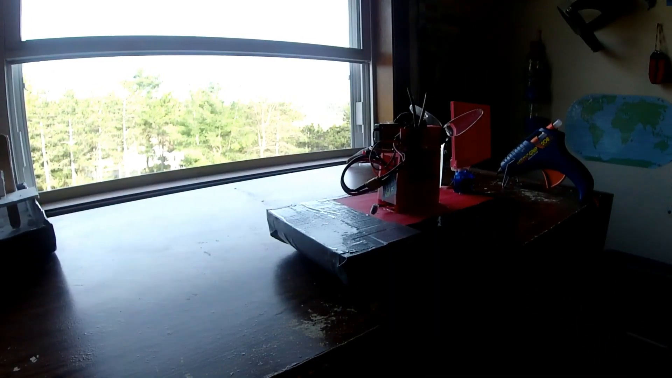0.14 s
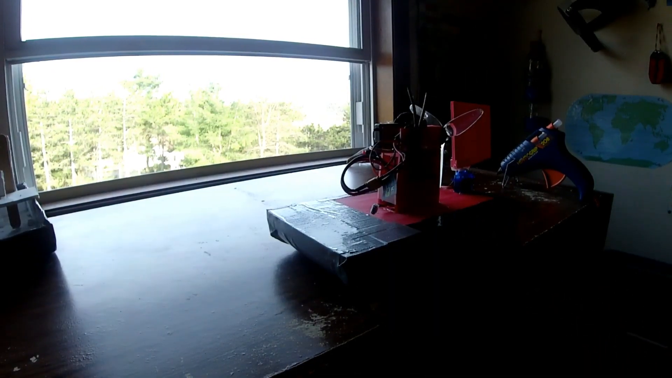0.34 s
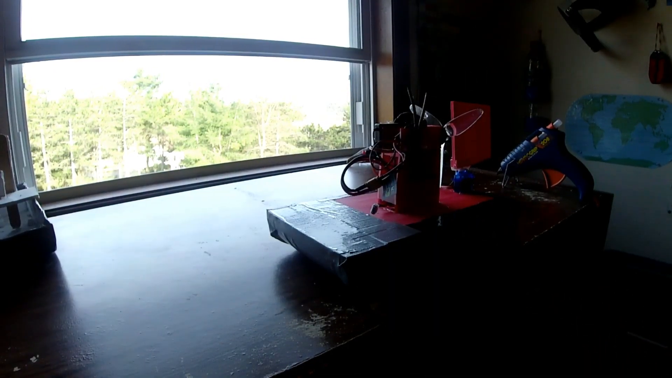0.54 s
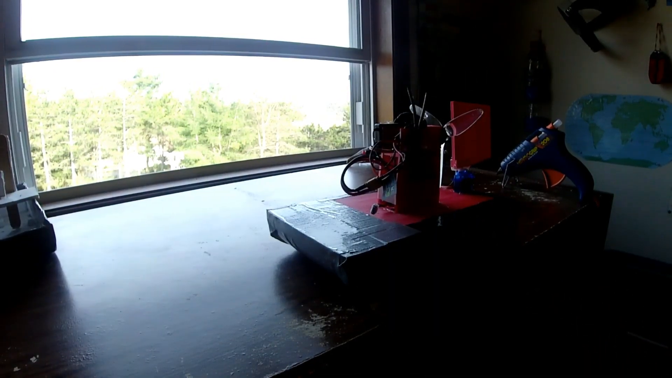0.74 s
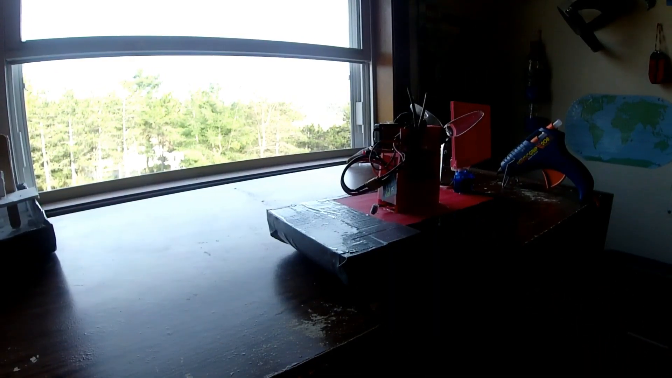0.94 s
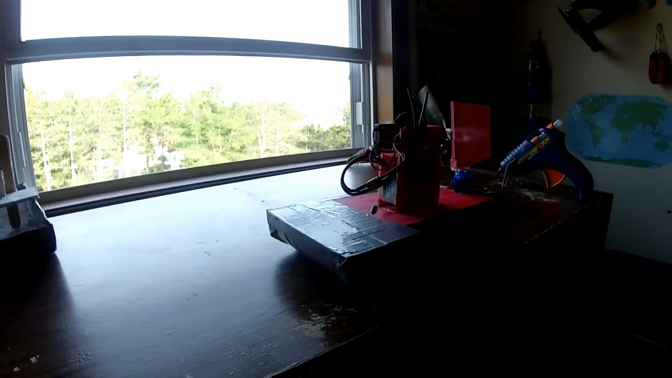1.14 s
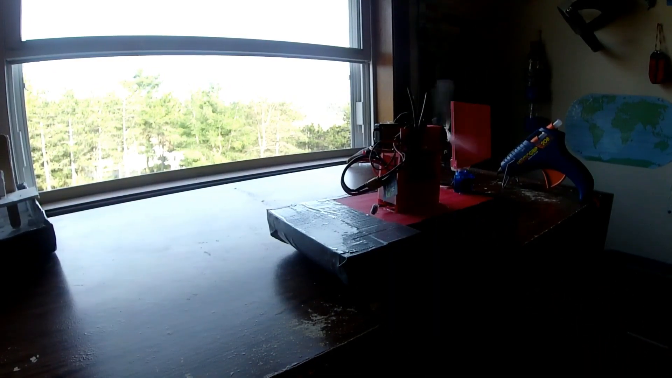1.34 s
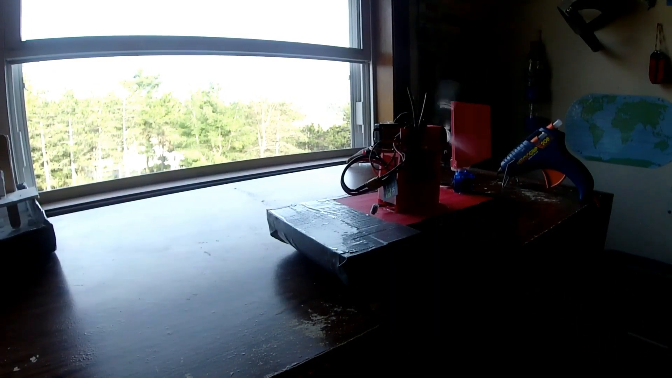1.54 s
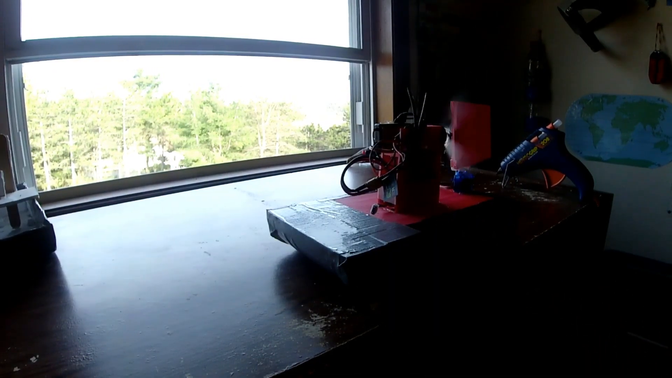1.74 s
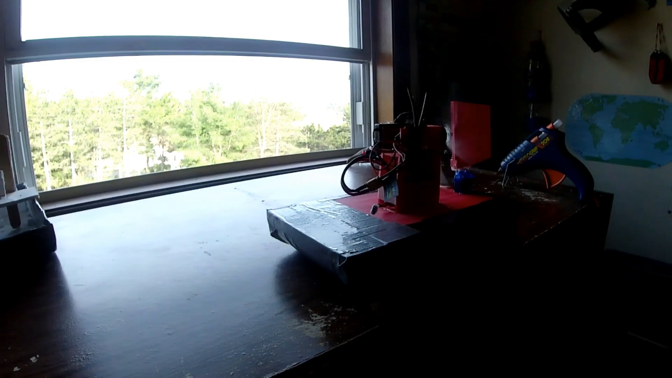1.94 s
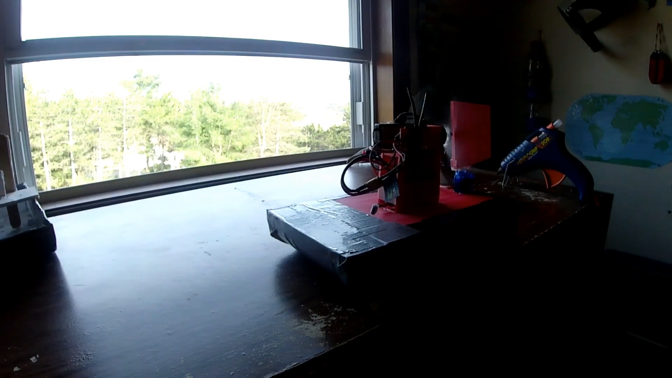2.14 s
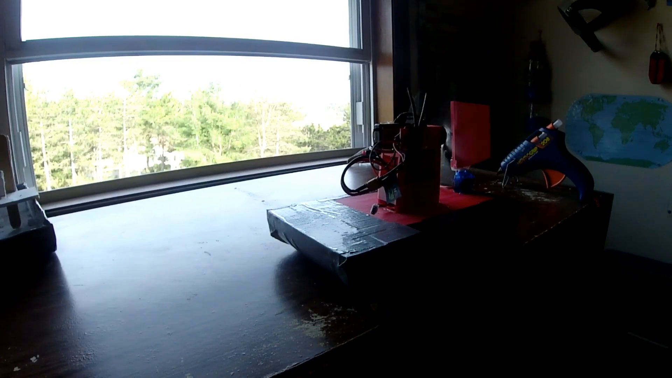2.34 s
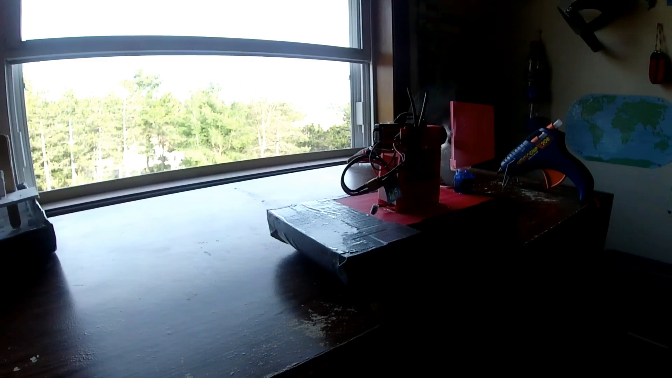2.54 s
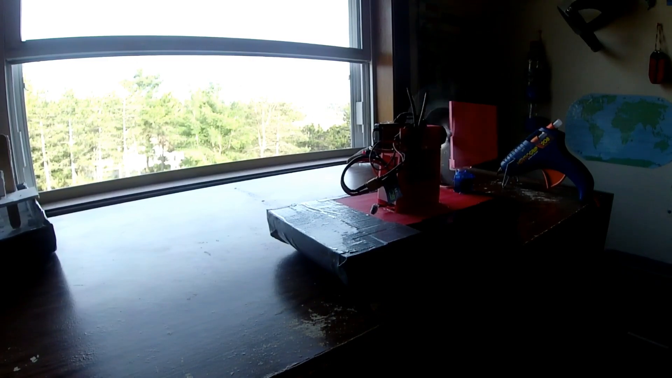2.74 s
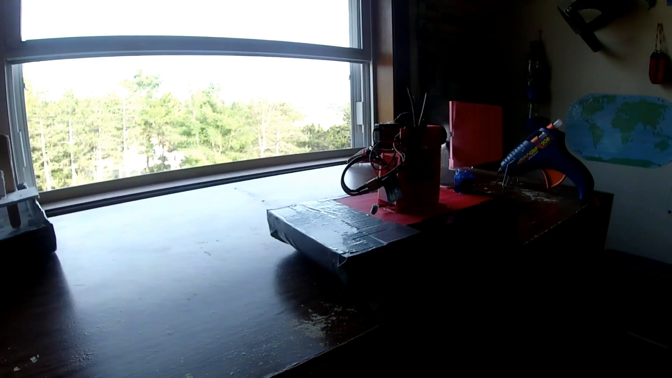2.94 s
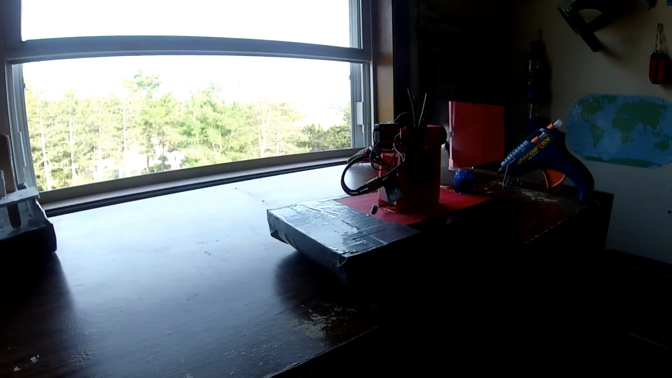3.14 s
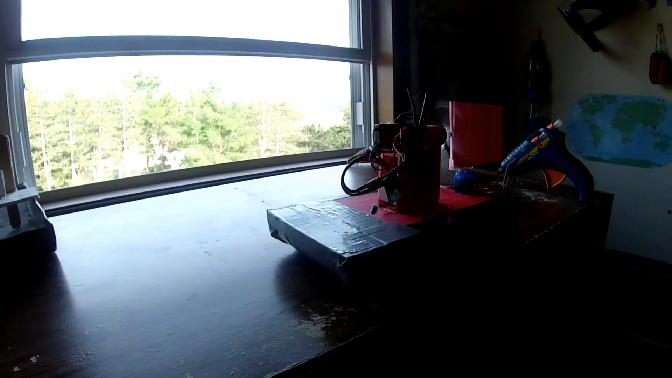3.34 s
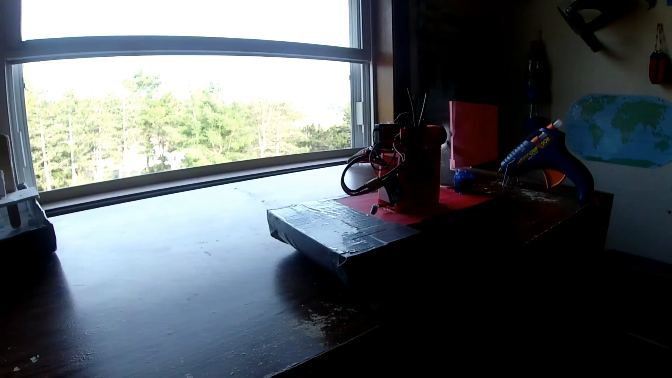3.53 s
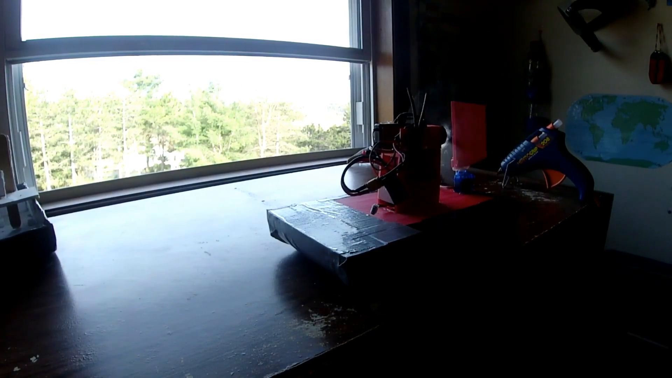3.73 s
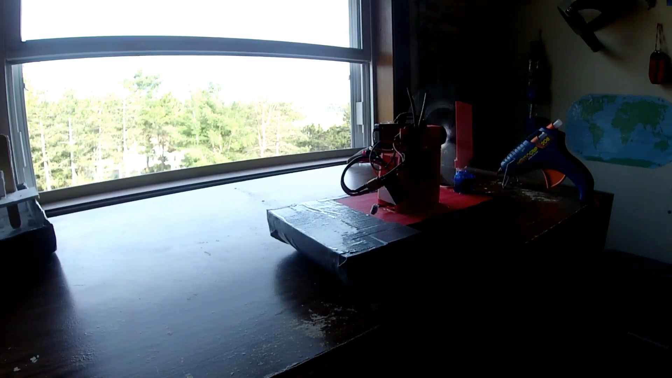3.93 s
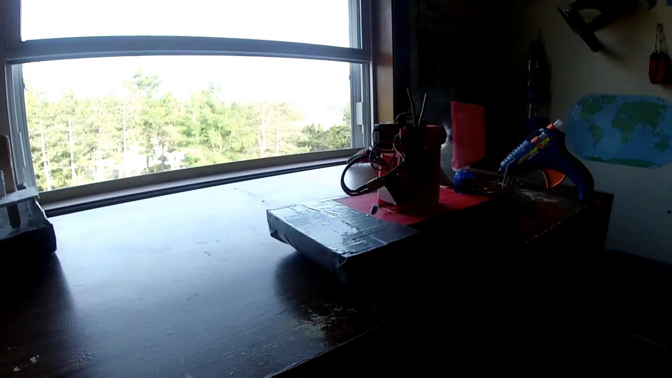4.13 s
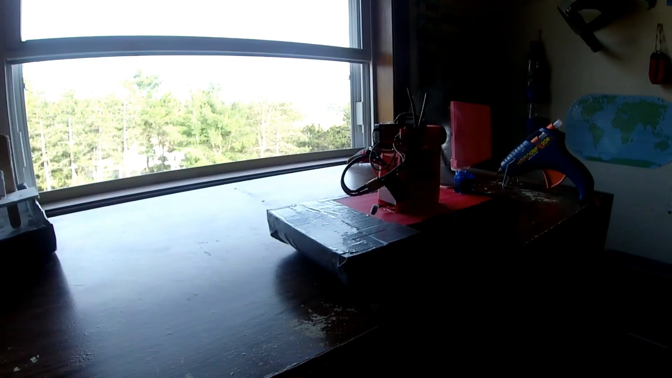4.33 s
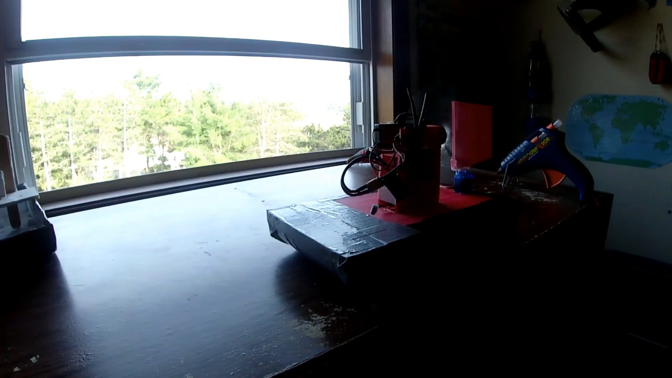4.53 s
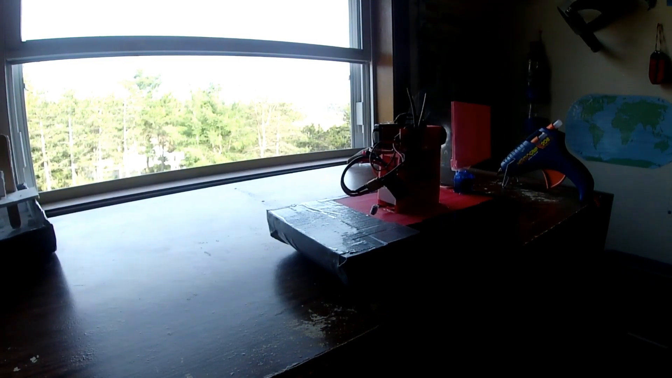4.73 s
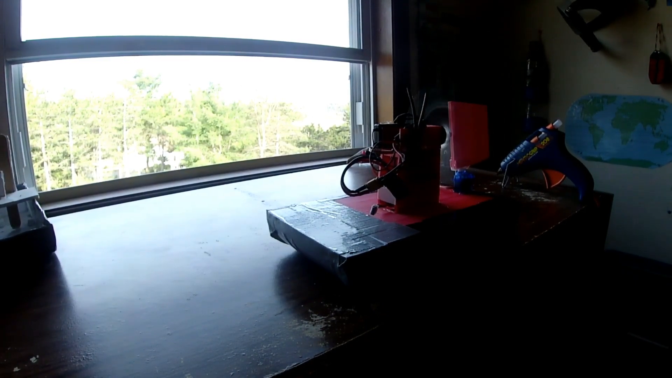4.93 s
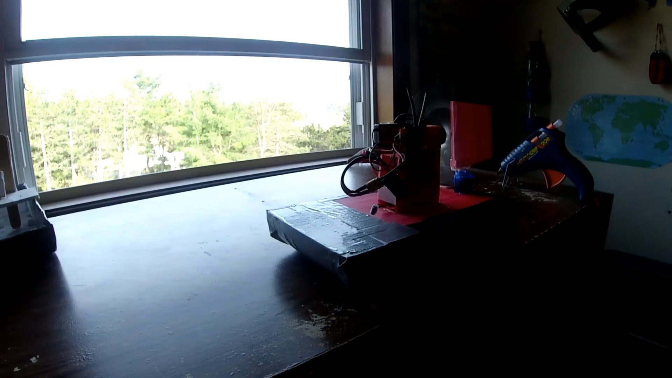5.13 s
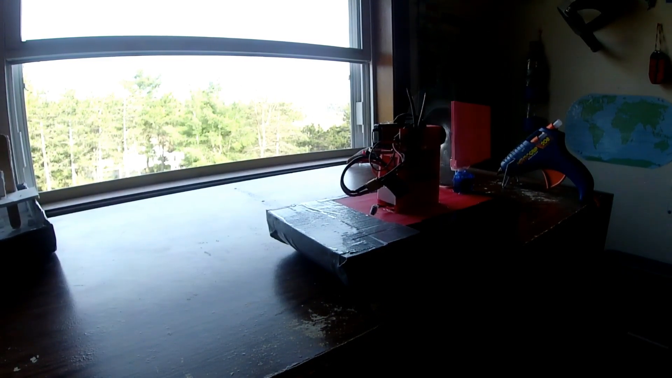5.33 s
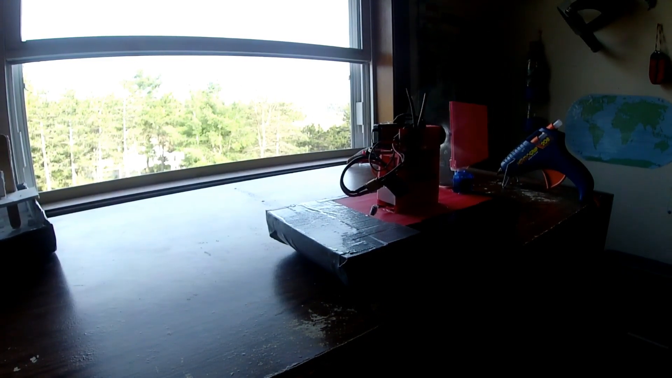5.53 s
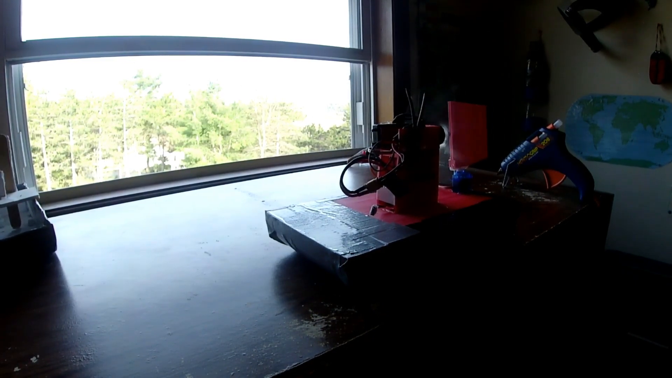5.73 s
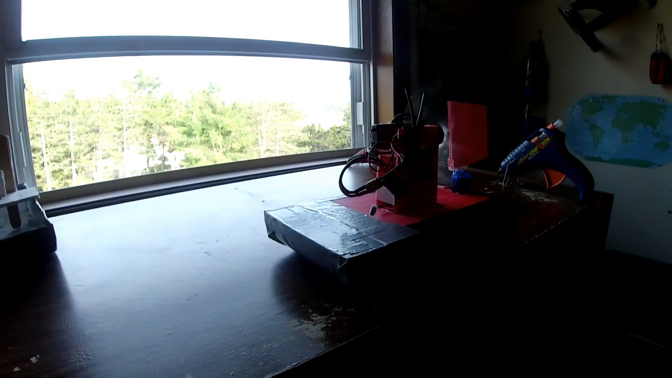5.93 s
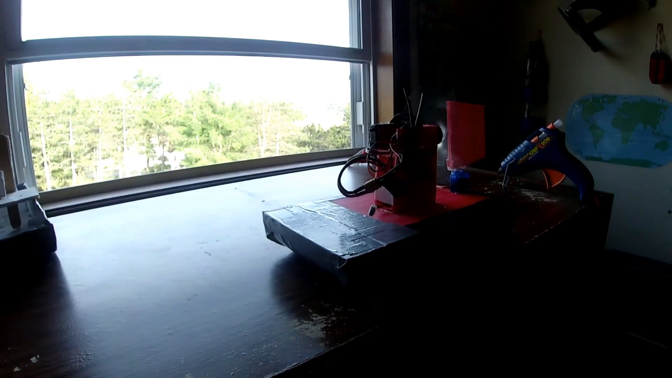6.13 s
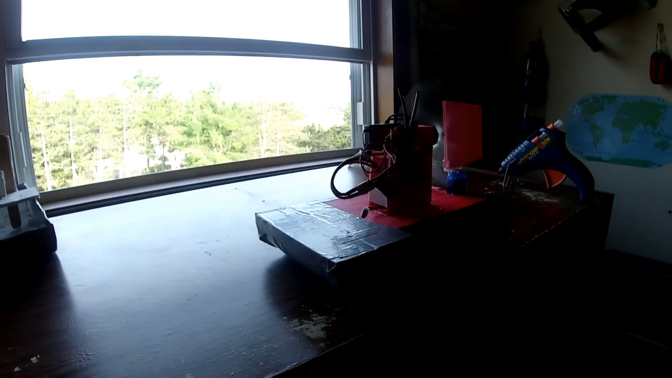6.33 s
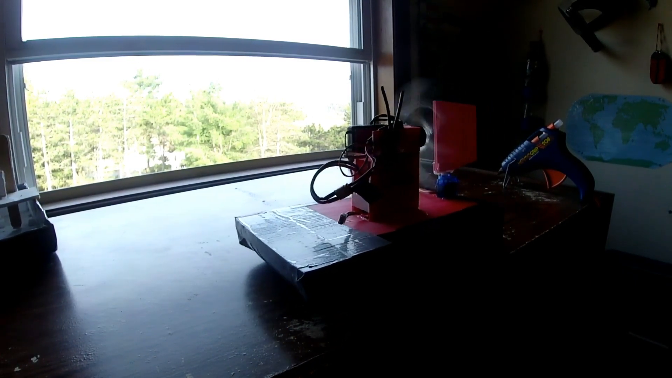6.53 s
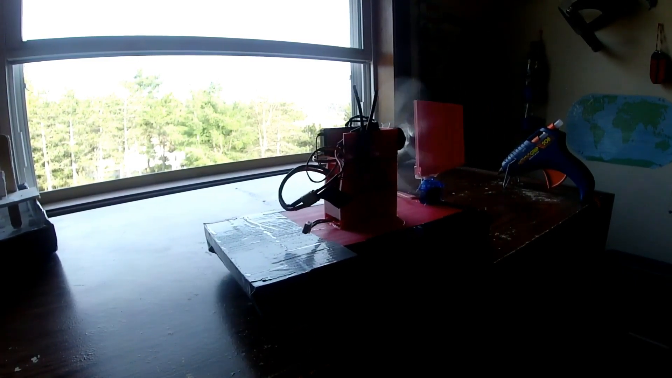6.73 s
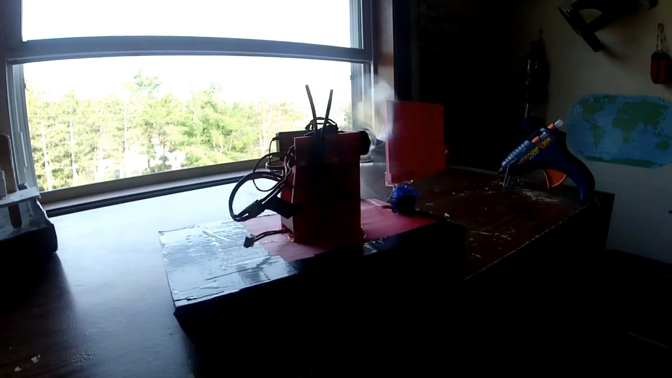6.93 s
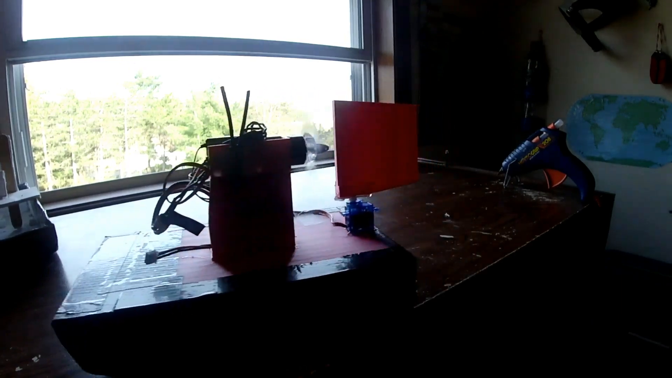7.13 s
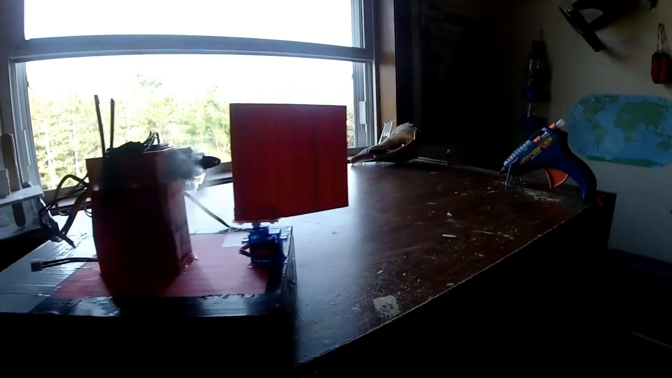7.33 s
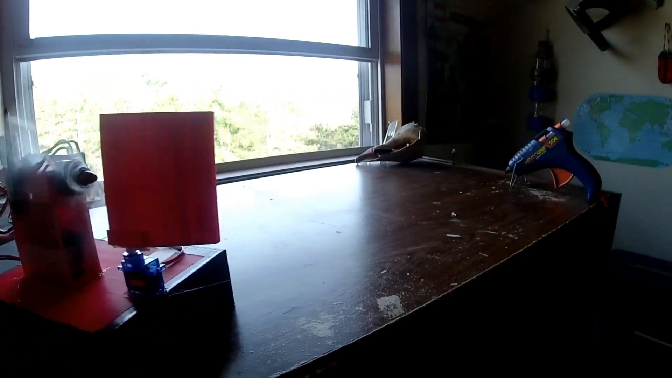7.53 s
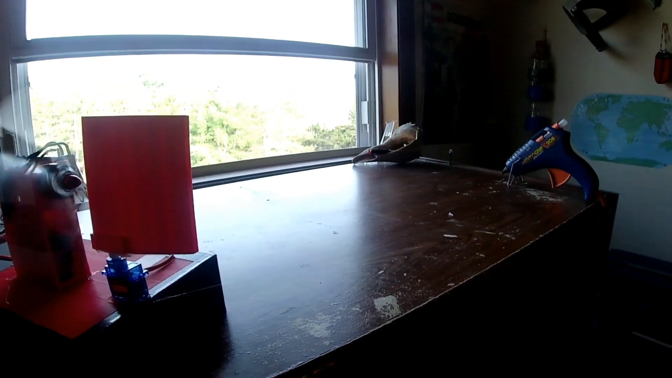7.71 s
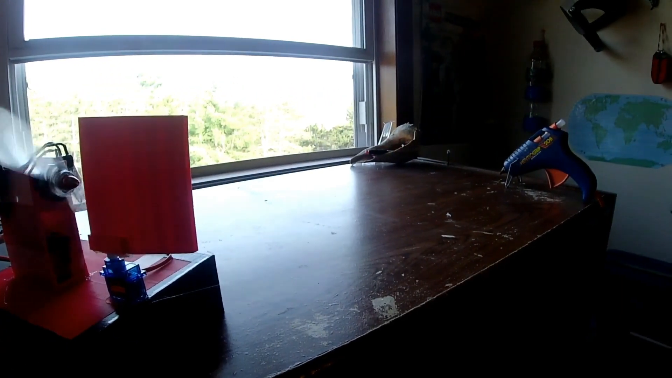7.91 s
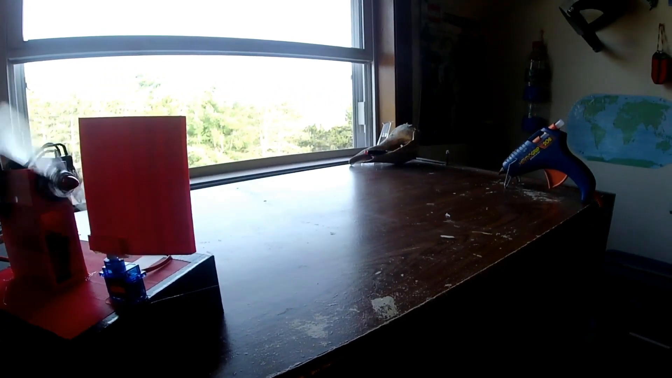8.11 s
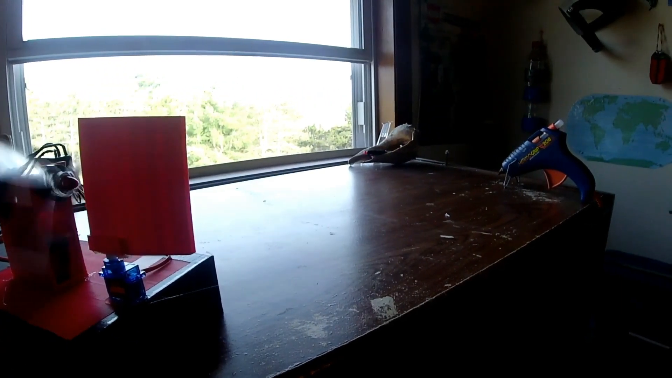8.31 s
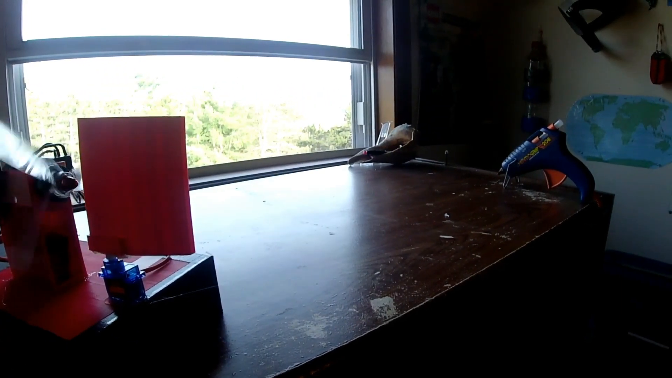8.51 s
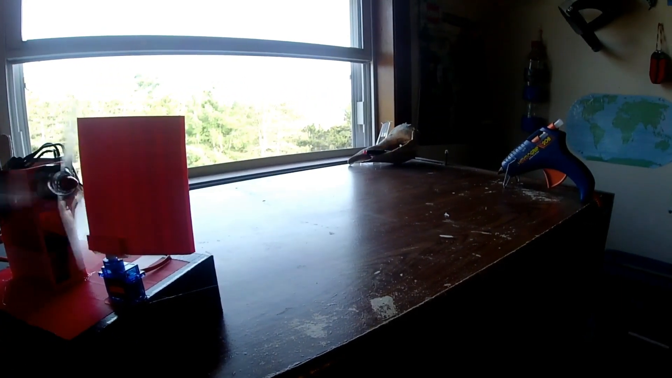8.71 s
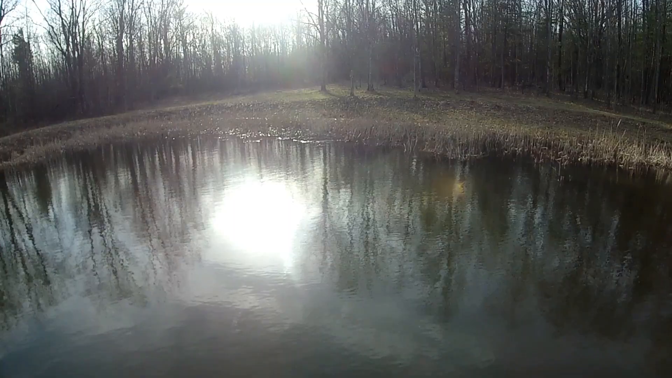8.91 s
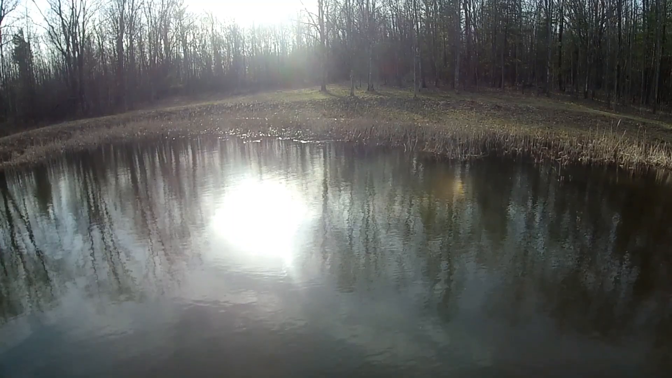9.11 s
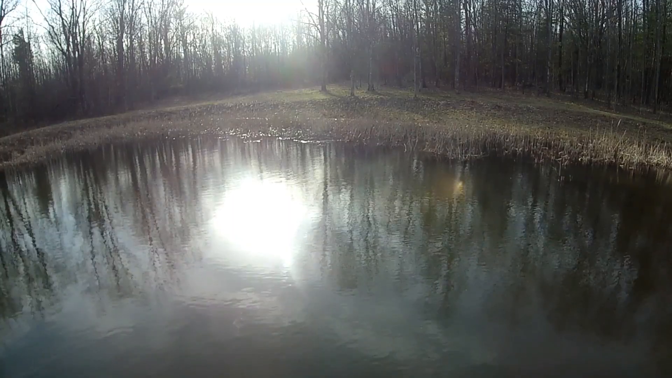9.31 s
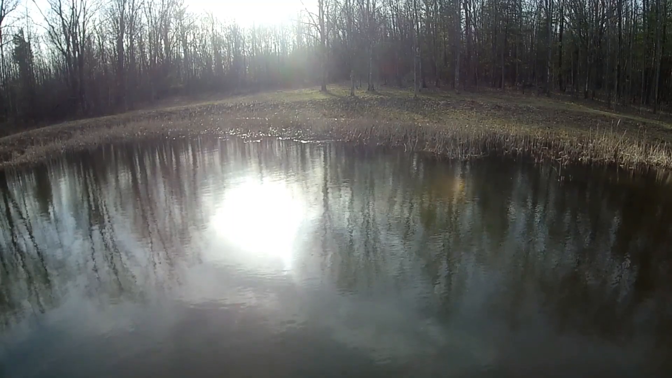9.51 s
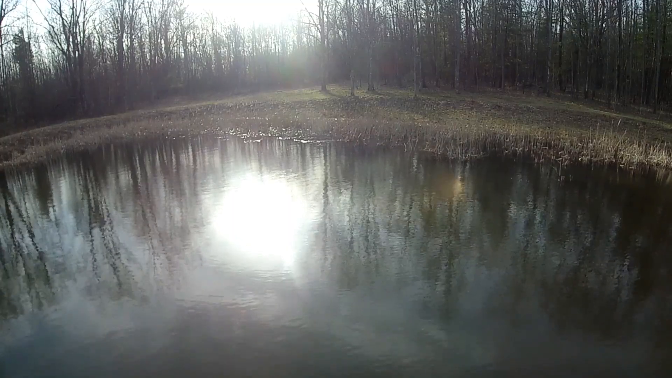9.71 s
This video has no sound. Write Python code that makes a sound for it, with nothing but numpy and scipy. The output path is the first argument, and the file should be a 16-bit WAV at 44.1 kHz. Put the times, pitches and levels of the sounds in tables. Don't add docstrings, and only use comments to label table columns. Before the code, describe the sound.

Quiet small-room tone with a tiny tap at the start. At about 1 second a small electric motor switches on with a thin, very high, nearly steady electronic whine and a gritty buzz; the rotor lurches and falters until about 1.5 seconds, then catches. From 2 seconds the three-blade propeller hums higher in uneven steps, dipping slightly near 3.3 and 4.3, with a soft desk bump around 3.8. Air hiss thickens, gusts roughen the blade buzz around 5 to 6, and brief metallic chirps pass. From 6.3 to 7.4 it holds full speed, a loud, rough, windy drone, creeping closer. Near 7.5 power cuts: the whine stops and the drone slides quickly downward, fading into faint cogging and air by 8.6. Close finger taps and rubs begin around 8.1, cluster at 8.7 with a sharp button click, then everything cuts to silence at 8.93.

```python
import sys
import numpy as np
from scipy import signal
from scipy.fft import rfft, irfft, next_fast_len
from scipy.io import wavfile
from scipy.ndimage import uniform_filter1d

SR = 44100
rng = np.random.default_rng(int(sys.argv[2]) if len(sys.argv) > 2 else 0)


def to_linear_factor(level_db):
    exponent = np.asarray(level_db, float) / 20
    return 10 ** exponent


def master(y):
    cut = np.clip(np.atleast_2d(y).T, -1, 1)
    pcm = np.round(cut * 32767)
    wavfile.write(sys.argv[1], SR, pcm.astype(np.int16))


N = 434826
T = np.arange(N) / SR
SLOW = T[::128]
FULL_HZ = 163
POWER_ON_S, POWER_OFF_S = .971, 7.52


def full(control):
    return np.interp(T, SLOW, control)


def rises(clock, start_s, length_s):
    return np.clip((clock - start_s) / length_s, 0, 1)


def falls(clock, end_s, length_s):
    return np.clip((end_s - clock) / length_s, 0, 1)


def evened(x):
    return x / np.sqrt(np.mean(x ** 2) + 1e-20)


def curves(rows):
    s, *columns = np.transpose(rows)
    return [np.interp(SLOW, s, c) for c in columns]


def read(points, hz):
    f, value = np.transpose(points)
    return np.interp(np.log(hz + 1), np.log(f + 1), value)


def lift_db(modes, x):
    return sum(db / (1 + (2 * (x - centre) / width) ** 2) for centre, width, db in modes)


def swell_db(order, swells):
    return lift_db([(s, length, db) for s, length, k, db in swells if round(k) == order], SLOW)


def coloured(gain):
    size = next_fast_len(N)
    spectrum = rfft(rng.standard_normal(size)) * gain(np.fft.rfftfreq(size, 1 / SR))
    return evened(irfft(spectrum, size)[:N])


def band(hz, width):
    return coloured(lambda f: 1 / (1 + (2 * (f - hz) / width) ** 2))


def wander(per_s):
    knots = uniform_filter1d(rng.standard_normal(2000), size=3)
    return np.interp(SLOW * per_s * 3, np.arange(2000), evened(knots))


def tone(turns, db, waver_db, per_s=8.0, slip=0., scatter=1):
    gain = full(np.sqrt(2) * to_linear_factor(db + waver_db * wander(per_s)))
    start = scatter * 2 * np.pi * rng.random()
    return gain * np.cos(2 * np.pi * turns + full(slip * wander(per_s) + start))


# start_s, shaft_hz
START_STEPS = [(.95, 2.9), (1.1, 7), (1.3, 21), (1.43, 22), (1.46, 30.5), (1.55, 33.5), (1.7, 43),
               (1.9, 56.5), (2.0, 66)]
# start_s, shaft_hz
THROTTLE_STEPS = [(2.18, 83), (2.4, 93.5), (3.24, 89), (3.43, 101.5), (3.59, 104.2), (4.25, 102.9),
                  (4.46, 113.5), (4.62, 116), (4.95, 126.3), (5.33, 136.8), (5.66, 148.8), (6.0, 155.3),
                  (6.26, 163.1), (7.35, 163.1), (7.45, 143)]


def shaft():
    drag_s, drag_share, friction_hz_per_s = .23, .634, 29.
    coast_s = np.maximum(SLOW - THROTTLE_STEPS[-1][0], 0)
    left = 1 - drag_share * (1 - np.exp(-coast_s / drag_s))
    hz = curves(START_STEPS + THROTTLE_STEPS)[0] * left - friction_hz_per_s * coast_s
    hz = uniform_filter1d(np.maximum(hz, 1), size=24)
    return hz, np.cumsum(full(hz)) / SR


# per_turn, full_speed_db, slope_db_per_decade, waver_db
LOW_ORDERS = [(1, -50.5, 23, 0.3), (2, -47.5, 65, 2.2), (3, -33.5, 59.5, 0.92), (6, -45.5, 73, 2),
              (9, -45, 48, 3.5), (12, -44, 52.5, 3)]
# centre_hz, width_hz, lift_db
DESK_MODES = [(72, 13, -12.5), (110.4, 9.6, 9.5), (150.6, 8.7, -25), (173, 14, -7), (225.8, 16, 6),
              (250, 40, -1), (285.3, 24, -7), (358.2, 38, -7.5), (750, 47, -9.5), (953, 37, 6.5),
              (1190, 60, -3.5), (1260, 130, -5.5), (1555, 60, 3.5)]
# centre_s, length_s, per_turn, lift_db
ORDER_SWELLS = [(3.2, 0.32, 9, 5), (4.1, 0.19, 9, -4), (5.9, 0.19, 3, 3), (3.5, 0.088, 3, 3.5),
                (5.05, 0.17, 12, 5.5), (5.8, 0.071, 9, 4.5), (5.97, .2, 6, -12.5), (6.5, 0.34, 1, -11),
                (6.0, 0.4, 2, -12), (7.05, .5, 2, 5), (2.1, 0.28, 9, -0.5), (6.7, .08, 12, -10),
                (6.38, .1, 12, 10), (6.63, 0.13, 18, 9.5), (7.1, 0.27, 15, 2), (6.79, 0.25, 9, -9),
                (7.13, 0.1, 18, 14.5), (7.32, 0.11, 9, 12.5), (7.27, .25, 6, 5.5), (7.2, 0.41, 1, 7.5),
                (7.32, 0.15, 21, 9.5), (5.51, 0.33, 6, 9), (6.97, 0.49, 3, 5.5), (7.46, 0.09, 6, 6.5),
                (7.48, 0.11, 9, 7), (4.1, 0.19, 18, -0.5), (2.75, .6, 1, -7), (4.9, 0.2, 3, 7.5),
                (4.5, .15, 3, 1), (4.5, 0.11, 9, 5.5), (2.9, 0.39, 9, -4), (3.6, .3, 6, -4),
                (4.15, 0.33, 6, 7), (3.7, 0.38, 15, 5), (6.3, 0.18, 15, -7), (2.6, 0.25, 9, -6),
                (4.6, 0.3, 4, -11), (5, 0.53, 5, -10.5), (4.3, .15, 18, 6.5), (5.4, .2, 21, -0.5),
                (7.5, .15, 29, -8.5), (5.7, 0.21, 21, 5), (5.5, .2, 1, 4), (6.6, 0.13, 12, 5.5),
                (5.8, 0.079, 24, -3), (4.8, .3, 21, -4.5), (3.5, .3, 6, -3.5), (3.45, .15, 9, -3),
                (6.45, 0.14, 15, 4), (7.5, .2, 2, -8),
                (2.3, 0.28, 15, -6.5), (3.5, .8, 15, -6), (5.65, .3, 15, -4.5), (6.55, 0.33, 15, 6),
                (6.55, .25, 18, 3), (3.1, .7, 18, -4.5), (4.75, .3, 18, -2), (2.4, .3, 21, -7),
                (7.2, 0.25, 21, -2.5), (6.2, .25, 24, 5), (3.2, .5, 24, 3), (4.7, 0.57, 27, -8.5),
                (3.85, .3, 23, -6), (6.55, 0.27, 27, -9.5), (6.2, .2, 33, 9), (6, .25, 28, 5),
                (4.75, .3, 30, -5.5), (6.55, 0.22, 9, -6), (6.58, .25, 12, -6), (7.12, .2, 12, 4),
                (3.9, 0.63, 12, 2.5), (7.58, .15, 18, -4), (7.52, 0.22, 24, -5), (7.57, .12, 15, -6),
                (7.5, .2, 21, -4), (6.85, .35, 18, -6), (7.45, .1, 3, -4), (7.64, .15, 3, 5),
                (7.62, .08, 12, 6)]
ALL_SWELLS = ORDER_SWELLS


def low_orders(hz, turns, near_db):
    decades = np.log10(hz / FULL_HZ)
    loaded = falls(SLOW, 7.5, .1)
    unloaded = rises(SLOW, 7.48, .12)
    out = 0
    for k, db, slope, waver in LOW_ORDERS:
        level_db = db + slope * decades + near_db + loaded * lift_db(DESK_MODES, k * hz)
        level_db = level_db + swell_db(k, ALL_SWELLS) + .5 * (k > 4) * unloaded
        out = out + tone(k * turns, level_db, waver, 17.0, 0.2 * waver, scatter=0)
    return out


# blade_multiple, level_db
SLAP_PARTIALS = [(1, 0), (2, -13), (3, -17), (4, -10), (5, -17), (6, -19), (7, -17.5), (8, -19), (9, -18),
                 (10, -22), (11, -25), (12, -24), (13, -24.5), (14, -26), (15, -26.5), (16, -29.5)]
# centre_hz, width_hz, lift_db
MOUNT_MODES = [(1510, 340, 7.5), (2106, 75, -0.5), (2110, 120, 4), (2700, 59, 5.5), (3055, 100, 4),
               (3630, 150, 1), (4070, 200, -0.5)]
# centre_s, length_s, lift_db
GUSTS = [
    (4.91, .04, 3.5),
    (5.02, .04, 6),
    (5.11, .06, 6),
    (5.18, .05, 5),
    (5.32, .07, 5),
    (5.81, .04, 5),
    (6.08, .05, 4),
    (6.17, .05, 5),
]


def blade_slap(hz, turns, near_db, free):
    slap_db = -35 + 52 * np.log10(np.maximum(hz, 97.5) / FULL_HZ) + near_db
    slap_db = slap_db + free * (-34.5 - slap_db)
    slap_db = slap_db - 20 * np.exp(-(hz / 78) ** 5)
    slap_db = slap_db - 12 * rises(SLOW, 7.55, .08)
    out = 0
    for k, db in SLAP_PARTIALS[4:]:
        level_db = slap_db + db + 3.5 + lift_db(MOUNT_MODES, 3 * k * hz)
        level_db = level_db + swell_db(3 * k, ALL_SWELLS) + (k > 7) * lift_db(GUSTS, SLOW)
        out = out + tone(3 * k * turns, level_db, 3.4, 40.0, .1 * k, scatter=.3)
    for k in range(4, 21):
        if k % 3:
            level_db = slap_db - 15 - 1.28 * k - 7 * free + swell_db(k, ALL_SWELLS)
            out = out + tone(k * turns, level_db, 2.5, 9.0, 0.23)
    return out


# freq_hz, level_db per Hz
RUSH_SPECTRUM = [(40, -29), (70, -21), (250, -31.5), (600, -31), (1200, -29.5), (2000, -29.5), (3000, -28),
                 (5000, -27), (7700, -24.5), (10500, -29), (13000, -29.5), (15800, -28)]
# full_speed_db, slope_db_per_decade, idle_db while powered
RUSH_BANDS = [
    (-52, 63.5, -73),
    (-40.3, 38, -67),
    (-38, 48.5, -65.5),
]
RUSH_WAVER = (1.2, 1.2, .5)


def air_rush(hz, turns, near_db, free):
    shaft_phase = 2 * np.pi * turns
    throb = 1 + 0.51 * np.cos(3 * shaft_phase) + 0.22 * np.cos(6 * shaft_phase) + 0.11 * np.cos(shaft_phase)
    shares = (lambda f: 1 / (1 + (f / 300) ** 2),
              lambda f: 1 / (1 + (300 / (f + 1)) ** 2) / (1 + (f / 7000) ** 4),
              lambda f: 1 / (1 + (7000 / (f + 1)) ** 4))
    idling = (SLOW > POWER_ON_S) * (1 - free)
    rush = 0
    for (db, slope, idle_db), share, waver_db in zip(RUSH_BANDS, shares, RUSH_WAVER):
        moving = to_linear_factor(db + slope * np.log10(hz / FULL_HZ) + near_db)
        gain = np.hypot(moving, idling * to_linear_factor(idle_db)) * to_linear_factor(waver_db * wander(14.0))
        rush = rush + full(gain) * coloured(lambda f: share(f) * to_linear_factor(read(RUSH_SPECTRUM, f)))
    return throb * rush * falls(T, 8.72, .12)


# time_s, nearer_db
NEARNESS = [
    (6.4, 1.5),
    (7.1, 0),
    (7.31, 2),
    (7.45, 2),
    (8.6, -6),
]


def propeller(hz, turns):
    near_db = curves(NEARNESS)[0]
    free = rises(SLOW, 7.42, .12)
    on = rises(T, 1.6, .036) * falls(T, 8.7, .15)
    tones = low_orders(hz, turns, near_db) + blade_slap(hz, turns, near_db, free)
    return on * tones + air_rush(hz, turns, near_db, free)


# centre_s, length_s, shift_hz
PITCH_LURCH = [
    (1.25, .1, 55),
]


def switching(hz, hunting):
    switch_hz = 7529.5 - 55 * np.exp(-(hz / 42) ** 3) + lift_db(PITCH_LURCH, SLOW)
    switch_hz = switch_hz + (1.5 + 22 * hunting) * wander(25.0)
    return switch_hz, np.cumsum(full(switch_hz)) / SR


# time_s, switching_tone_db
WINDING_CURRENT = [(0.99, -52), (1.04, -55), (1.3, -46.5), (1.35, -56), (1.53, -48), (1.66, -51),
                   (2.08, -41), (4.4, -40), (4.8, -44), (4.99, -37.5), (5.2, -42.5), (6.4, -42.5),
                   (7.41, -44.5), (7.5, -56.5)]
# added_turns, level_db
OCTAVE_TONES = [(-6, -4), (-14, -8), (-3, -7), (-9, -8), (9, -2)]


def switching_tones(hz, turns, cycles, easing_db):
    octave_db = -56 + 2.0 * wander(3.0) + 2 * easing_db
    out = tone(cycles, curves(WINDING_CURRENT)[0] - .3 + easing_db, 2.6, 28.0, .2)
    out += tone(2 * cycles, octave_db + 12, 2.2, 60.0, .55)
    for k, db in OCTAVE_TONES:
        out += tone(2 * cycles + k * turns, octave_db + db - 9.0 * hz / FULL_HZ, 3.5, 20.0, .8)
    return out


# added_turns, level_db
SIDE_TONES = [(14, 0), (11, -6), (10, -16), (2, -16), (1, -13), (-1, -15), (-3, -10), (-14, -11),
              (-42, -20)]
# centre_s, length_s, lift_db
SIDE_SURGES = [
    (1.528, 0.11, 8),
    (2.7, 0.0694, 5.5),
    (1.28, 0.17, -0.5),
    (1.38, 0.088, -14.5),
    (1.68, 0.19, -13),
    (2.3, .2, -2),
    (7.5, 0.27, 0.5),
    (4.4, 1, 5),
]
# centre_s, length_s, added_turns, lift_db
SIDE_SWELLS = [(1.53, .14, 11, 8), (1.9, .09, 10, 20), (1.82, .1, 10, 12), (1.66, .14, 10, 12),
               (1.75, .12, 14, -7), (1.93, .1, 14, 4), (1.2, .4, -14, -10), (1.2, .5, -42, -15),
               (1.05, .15, 14, -8), (4.8, .5, -3, 3), (2.2, .3, 11, 3), (2.75, .55, 14, -9),
               (3.8, .6, 14, 3), (2.95, .55, 11, -10), (4.55, .5, 11, -6), (3.95, .7, -14, -13),
               (5.95, .3, 14, -6), (6.55, .3, 14, -5), (7.1, .35, 14, -6), (3.8, .8, -3, 5),
               (2.9, .5, -3, -7), (5.05, .25, -3, 5), (1.65, .35, -42, 6), (2.1, .3, -42, -10),
               (6.9, .6, -14, -5), (2.95, .5, -14, 6), (2.65, .3, 11, -5)]
# centre_hz, width_hz, lift_db
BELL_MODES = [(7930, 180, 13), (8070, 54, 5.4), (8360, 350, 11), (2103, 120, 19), (2860, 320, 2.8),
              (4030, 170, 0.98)]


def side_tones(hz, turns, switch_hz, cycles, hunting):
    calm_db = -44 - 6 * hz / FULL_HZ
    side_db = calm_db + lift_db(SIDE_SURGES, SLOW)
    out = 0
    for k, db in SIDE_TONES:
        level_db = side_db if k > 0 else calm_db - 10 * hunting ** 2
        level_db = level_db + db + lift_db(BELL_MODES, switch_hz + k * hz) + swell_db(k, SIDE_SWELLS)
        out = out + tone(cycles + k * turns, level_db, 1.4, 25.0, 0.42)
    rattle_db = side_db - 19.5 - 14 * np.exp(-(hz / 27) ** 8) + .7 * lift_db(BELL_MODES, switch_hz + 14 * hz)
    rattle_db = rattle_db + 5 * (SLOW > 1.62) * (SLOW < 2)
    out += tone((cycles + 14 * turns) / 2, rattle_db, 3.2, 50.0, 2.2)
    out += tone((cycles + 23 * turns) / 2, -59 - 9 * ((SLOW - 1.92) / .11) ** 2, 3.5, 40.0, 1.5)
    return out


# added_turns, level_db
HOUSING_TONES = [(0, -55.5), (8, -59), (11, -65), (14, -56), (17, -64)]
# centre_s, length_s, added_turns, lift_db
HOUSING_SWELLS = [
    (7.2, .5, 14, 11),
    (2.3, .4, 14, 3),
]


def housing_tones(hz, turns, cycles, easing_db):
    speed_db = -8.0 * np.exp(-(hz / 60) ** 4) - 12.0 * (hz / FULL_HZ) ** 3
    out = 0
    for k, db in HOUSING_TONES:
        level_db = db + speed_db * (k > 0) + 3 * easing_db + swell_db(k, HOUSING_SWELLS)
        out = out + tone(1.4818 * cycles + k * turns, level_db, 1.24, 20.0, 0.68)
    return out


# per_turn, level_db
MAGNET_ORDERS = [(42, -61)]
# centre_s, length_s, lift_db
COGGING_SWELLS = [
    (2.03, .12, 6),
    (2.25, .2, 3),
    (2.95, .4, 5),
    (3.36, .25, -9),
]
# centre_s, length_s, per_turn, level_db
MAGNET_CHIRPS = [(1.71, .1, 83, -63), (4.37, .06, 71, -53), (4.385, .06, 74, -50), (4.52, .1, 70, -45),
                 (4.51, .1, 74, -49), (4.62, .08, 70, -52), (5.56, .1, 56, -41), (5.57, .1, 53, -46),
                 (5.82, .14, 52, -44), (5.86, .1, 56, -47), (6.0, .2, 56, -50)]


def magnet_tones(hz, turns):
    out = 0
    for s, length, k, db in MAGNET_CHIRPS:
        out = out + tone(k * turns, db - 9 * (2 * (SLOW - s) / length) ** 2, 1.5, 17.0)
    for k, db in MAGNET_ORDERS:
        level_db = db + lift_db(BELL_MODES, k * hz) - 22 * np.exp(-(hz / 47) ** 8)
        out += tone(k * turns, level_db + lift_db(COGGING_SWELLS, SLOW), 2.5, 30.0, 1.5)
    return out


# freq_hz, level_db per Hz
FRAME_SPECTRUM = [(120, -51.5), (200, -20.5), (334, -15.5), (464, -27.5), (547, -15.5), (1340, -20.5),
                  (2110, -21.5), (3400, -17.5), (6330, -39), (7740, -0.5), (9820, -32), (11000, -26),
                  (13700, -35.5), (14700, -5.5), (15800, -16)]
# centre_hz, width_hz, level_db
FRAME_MODES = [(548, 95, -64.5), (2090, 130, -62), (2900, 81, -64.5), (7850, 54, -51), (8300, 88, -55),
               (3520, 150, -71), (5770, 100, -67.5)]
# centre_s, length_s, lift_db
START_STUTTERS = [
    (.98, 0.031, -4),
    (1.08, 0.21, -11),
    (1.42, 0.24, -7),
]


def frame_buzz(hz, hunting):
    buzz = to_linear_factor(-48) * coloured(lambda f: to_linear_factor(read(FRAME_SPECTRUM, f)))
    slow_lift_db = 3.04 * np.exp(-(hz / 60) ** 4)
    jolts = full(to_linear_factor(-5.0 + slow_lift_db - 5.0 * (hz / FULL_HZ) ** 2))
    buzz += jolts * sum(to_linear_factor(db) * band(f, width) for f, width, db in FRAME_MODES)
    frame_db = -0.5 + 5 * np.exp(-(hz / 80) ** 4)
    frame_db = frame_db + lift_db(START_STUTTERS, SLOW) - 27 * rises(SLOW, 7.4, .146)
    return full(to_linear_factor(frame_db + 2.2 * wander(16.0) * (.4 + .6 * hunting))) * buzz


# centre_s, length_s, lift_db
CURRENT_EASING = [
    (4.72, .5, -3),
]


def motor(hz, turns):
    hunting = np.exp(-(SLOW - 1) / .3).clip(0, 1)
    easing_db = lift_db(CURRENT_EASING, SLOW)
    switch_hz, cycles = switching(hz, hunting)
    out = switching_tones(hz, turns, cycles, easing_db)
    out += side_tones(hz, turns, switch_hz, cycles, hunting)
    out += housing_tones(hz, turns, cycles, easing_db)
    out += magnet_tones(hz, turns) + frame_buzz(hz, hunting)
    return rises(T, POWER_ON_S, .0067) * falls(T, POWER_OFF_S, .032) * out


# per_turn, level_db
WINDMILL_ORDERS = [(3, -60), (6, -70), (9, -62), (12, -63), (15, -68), (18, -70)]
# centre_s, length_s, per_turn, lift_db
WINDMILL_DRIFTS = [
    (7.76, 0.32, 3, 13),
    (8.06, .3, 3, -9),
    (8.22, 0.22, 9, -10),
    (8.4, .15, 12, 4),
    (8.4, .3, 18, 6),
    (7.75, .15, 15, 4),
    (7.69, .12, 6, 4),
]


def coasting(hz, turns):
    slowing_db = 22 * np.log10(hz / 50)
    cogging = tone(84 * turns, slowing_db - 70 - 8 * (hz > 50), 4.5, 25.0, 2.2)
    cogging += tone(42 * turns, slowing_db - 73, 5.2, 13.0, 1.5)
    for k, db in WINDMILL_ORDERS:
        cogging += tone(k * turns, db + .9 * slowing_db + swell_db(k, WINDMILL_DRIFTS), 2.2, 18.0, 0.4)
    stir = to_linear_factor(-57.0) * coloured(lambda f: 1 / (1 + (f / 2400) ** 4))
    stir += to_linear_factor(-59.5) * band(540, 790) + to_linear_factor(-57.5) * band(1090, 350)
    stir += to_linear_factor(-59.0) * band(2310, 500) + to_linear_factor(-64.0) * band(2850, 300)
    bearings = full(to_linear_factor(1.55 * slowing_db - 1.5 + 1.5 * wander(22.0))) * stir
    return rises(T, 7.5, .038) * falls(T, 8.68, .04) * (cogging + bearings)


# rise_s, width_hz, width_per_centre_hz
TAP = (0.00089, 400, 1)
RUB = (0.011, 820, 1)
THUD = (.03, 510, 0.11)
HUM = (.03, 47, 0)
# peak_s, level_db, centre_hz
TAPS = [(.005, -51, 250), (8.064, -48, 5960), (8.174, -48.5, 3980), (8.1, -54, 2560), (8.169, -47, 2400),
        (8.402, -65, 3000), (8.436, -57, 4000), (8.495, -55, 3780), (8.597, -62, 2400), (8.684, -41, 4400),
        (8.696, -38, 4470), (8.793, -49, 2000), (8.905, -58, 2490), (8.911, -51, 2500), (8.697, -43, 11000),
        (8.727, -44, 5000), (8.786, -48.5, 5970), (8.811, -52, 6000), (8.843, -47, 4500),
        (8.878, -43, 3680)]
# peak_s, level_db, t60_s, centre_hz
RUBS = [(.47, -67.5, 0.058, 2000), (8.279, -61.5, 0.087, 8000), (8.31, -67, 0.077, 5000),
        (8.45, -65.5, 0.11, 5560), (8.505, -66.5, 0.09, 5000), (8.727, -40, 0.043, 5070),
        (8.732, -42, 0.042, 8340), (8.748, -44.5, 0.032, 4760), (8.826, -49, .017, 10800),
        (8.828, -41, .014, 2900), (8.822, -50.5, 0.032, 100), (8.74, -52.5, .04, 2510),
        (8.855, -62, 0.016, 2980)]
# peak_s, level_db
THUDS = [
    (.09, -64),
    (3.775, -47.5),
    (8.731, -59),
    (8.86, -59.5),
]
# peak_s, level_db
HUMS = [
    (1., -62),
    (1.15, -60),
    (1.43, -59),
]
# start_s, dent_db, dent_length_s, ring_hz, ring_db
BUTTON_CLICK = (8.6846, -22, .00025, 2700, -25)


def grain(s, db, t60, hz, kind):
    rise, width, widening = kind
    u = np.arange(-3 * rise, t60, 1 / SR)
    steepness = 3 if rise > .008 else 1
    shape = np.where(u < 0, np.exp(-(u / rise) ** 2), to_linear_factor(-60 * (abs(u) / t60) ** steepness))
    r = np.exp(-np.pi * (width + widening * hz) / SR)
    poles = [1, -2 * r * np.cos(2 * np.pi * hz / SR), r * r]
    noise = signal.lfilter([1, 0, -1], poles, rng.standard_normal(len(u)))
    noise = signal.lfilter([1], poles, noise)
    return max(round((s - 3 * rise) * SR), 0), to_linear_factor(db) * shape * evened(noise)


def button_click():
    s, dent_db, length, ring_hz, ring_db = BUTTON_CLICK
    u = np.maximum(T - s, 0)
    dent = -to_linear_factor(dent_db) * np.e * u / length * np.exp(-u / length)
    phase = 2 * np.pi * ring_hz * u
    return dent + to_linear_factor(ring_db) * np.sin(phase) * np.exp(-u / 0.0009) * (1 + 0.74 * np.cos(phase))


def touches():
    rows = [(s, db, 0.019, hz, TAP) for s, db, hz in TAPS]
    rows += [(s, db, t60, hz, RUB) for s, db, t60, hz in RUBS]
    rows += [(s, db, 0.17, 450, THUD) for s, db in THUDS]
    rows += [(s, db, 0.14, 333, HUM) for s, db in HUMS]
    out = np.zeros(N)
    for row in rows:
        start, burst = grain(*row)
        part = out[start:][:len(burst)]
        part += burst[:len(part)]
    return out + button_click()


def walls(x):
    u = np.arange(SR // 2) / SR
    tail = rng.standard_normal(len(u)) * to_linear_factor(-60 * u / 0.597) * (u > .004)
    tail = signal.sosfilt(signal.butter(4, (2200, 13500), "band", fs=SR, output="sos"), tail)
    return x + to_linear_factor(-9) * signal.oaconvolve(x, tail / np.linalg.norm(tail))[:N]


# centre_s, length_s, under_20_hz_db, from_20_to_55_hz_db
DRAUGHT_PUSHES = [(1.473, 0.051, 5.5, 10), (1.703, 0.043, 6, 3.5), (2.769, 0.74, 1, 4),
                  (3.299, 0.27, 3, 12.5), (3.749, 0.59, 2, 18), (4.667, 0.03, 11, 8), (5.693, 0.14, -4, 15),
                  (6.49, 0.33, 6, -0.5), (8.1, .15, 0.5, 16.5), (8.351, 0.28, 9, 3), (8.703, .15, 5, 10),
                  (8.86, 0.18, 5.5, 11)]
# centre_s, length_s, level_db, centre_hz, width_hz
PROPELLER_WASH = (7.15, 1.0, -48, 90, 90)


def draught():
    deep_db = -46 + lift_db([(s, length, deep) for s, length, deep, _ in DRAUGHT_PUSHES], SLOW)
    low_db = -62.5 + lift_db([(s, length, low) for s, length, _, low in DRAUGHT_PUSHES], SLOW)
    sway = full(to_linear_factor(deep_db)) * coloured(lambda f: (f > 5) / (1 + ((f - 11) / 5) ** 2))
    sway += full(to_linear_factor(low_db)) * band(33, 24)
    s, length, db, hz, width = PROPELLER_WASH
    return sway + to_linear_factor(db) * np.exp(-(2 * (T - s) / length) ** 2) * band(hz, width)


# start_s, swing_hz, height, rise_s, fall_s
DESK_SWING = (8.022, 12.1, .09, .06, .11)


def desk_swing():
    s, hz, height, rise, fall = DESK_SWING
    u = np.maximum(T - s, 0)
    return -height * np.e * (1 - np.exp(-u / rise)) * np.exp(-u / fall) * np.sin(2 * np.pi * hz * u)


# freq_hz, level_db per Hz
ROOM_SPECTRUM = [(24, -29), (40, -1.5), (91, -12.5), (123, -14.5), (147, -16.5), (362, -22), (390, -25.5),
                 (420, -23), (567, -26), (1430, -31.5), (15800, -39)]


def room():
    air = coloured(lambda f: to_linear_factor(read(ROOM_SPECTRUM, f)) * (f > 40))
    return full(to_linear_factor(-61.5 + 0.65 * wander(3.7))) * air


def scene():
    hz, turns = shaft()
    rig = propeller(hz, turns) + motor(hz, turns) + coasting(hz, turns)
    mono = walls(rig) + touches() + draught() + desk_swing() + room()
    return np.array([mono, mono])


def low_pass(x):
    return signal.sosfilt(signal.butter(12, 15760, fs=SR, output="sos"), x)


def record(dry):
    left, right = dry[0], np.roll(dry[1], -1)
    size = next_fast_len(N)
    hz = np.fft.rfftfreq(size, 1 / SR)
    no_bass = 1 / (1 + (250 / (hz + 1)) ** 2)
    side = irfft(rfft(left - right, size) * no_bass, size)[:N] / 2
    pair = (left + right) / 2 + np.array([side, -side])
    pair = signal.oaconvolve(pair, signal.firwin(255, 15900, fs=SR)[None], "same")
    return low_pass(pair * falls(T, 8.9295, .0015))


dry = scene()
out = record(dry)
master(out)
```